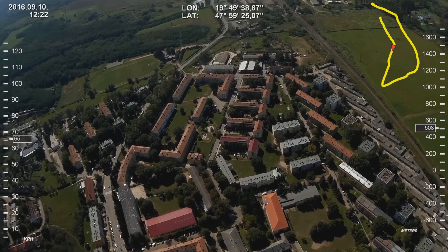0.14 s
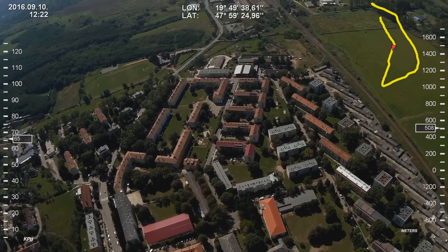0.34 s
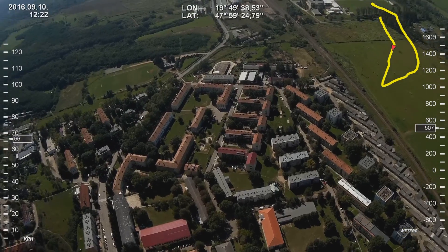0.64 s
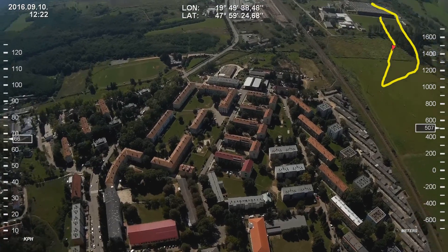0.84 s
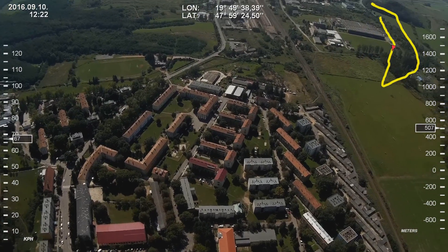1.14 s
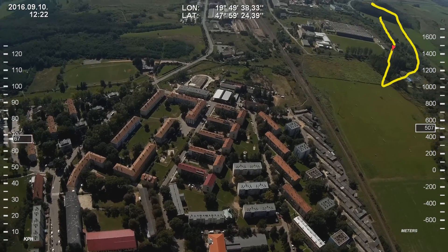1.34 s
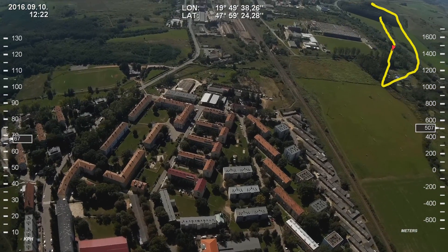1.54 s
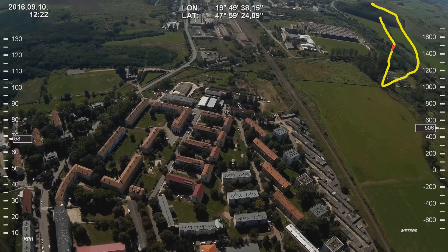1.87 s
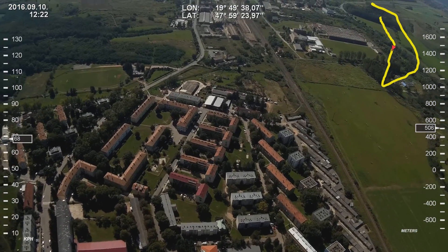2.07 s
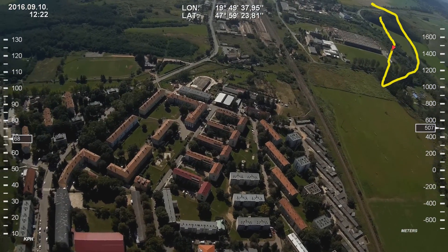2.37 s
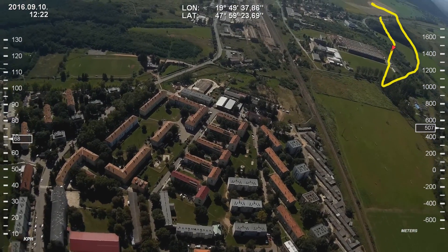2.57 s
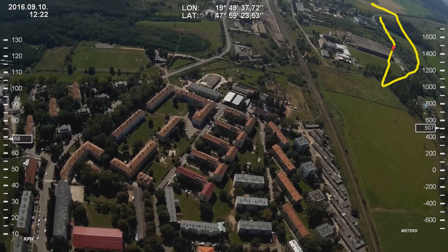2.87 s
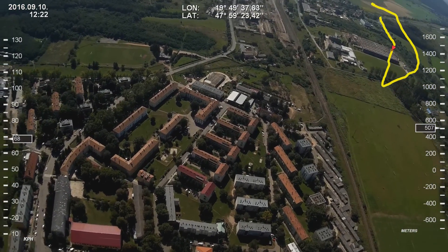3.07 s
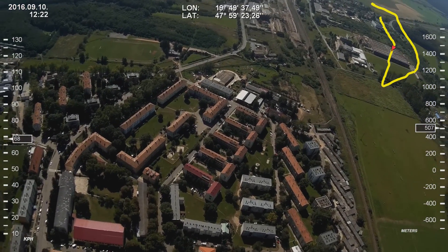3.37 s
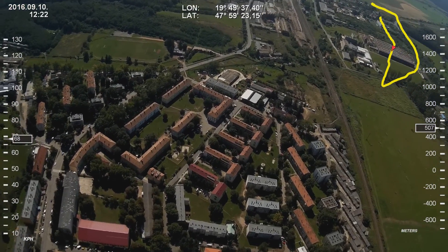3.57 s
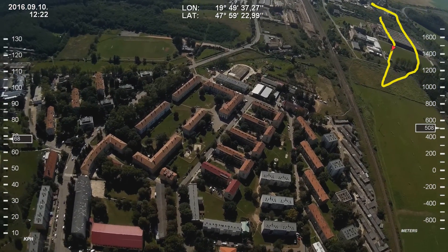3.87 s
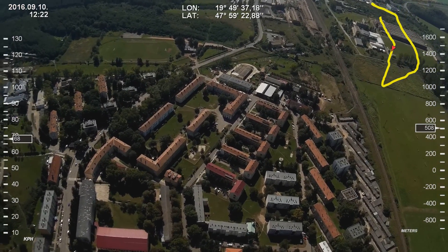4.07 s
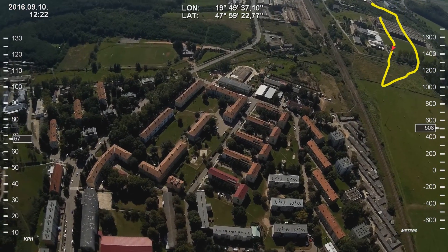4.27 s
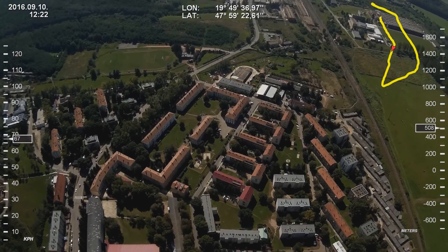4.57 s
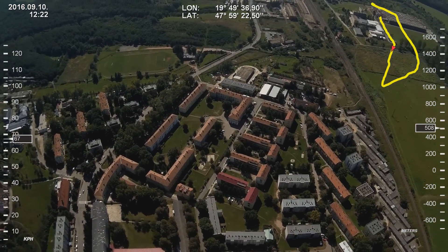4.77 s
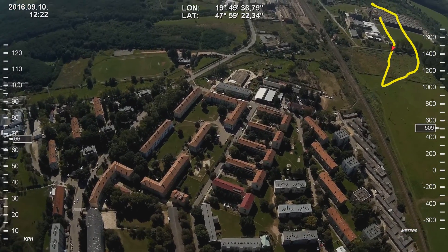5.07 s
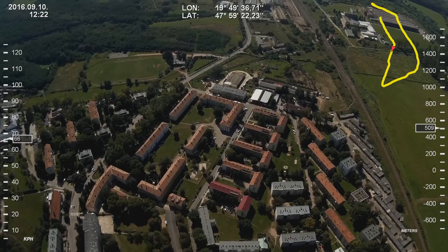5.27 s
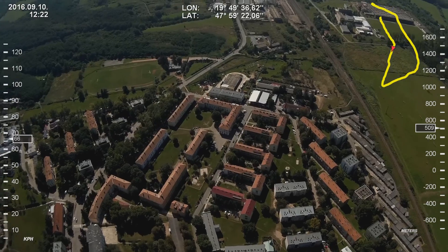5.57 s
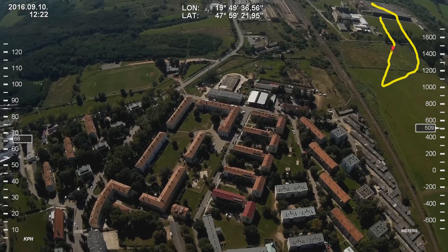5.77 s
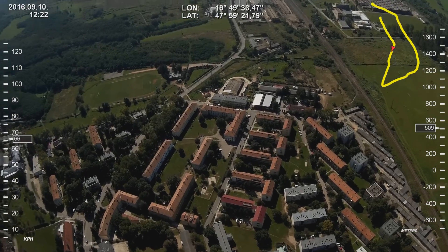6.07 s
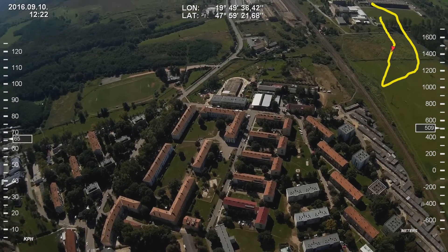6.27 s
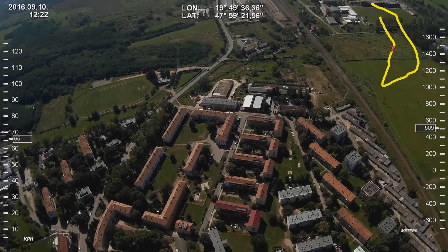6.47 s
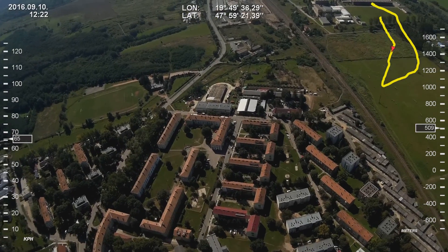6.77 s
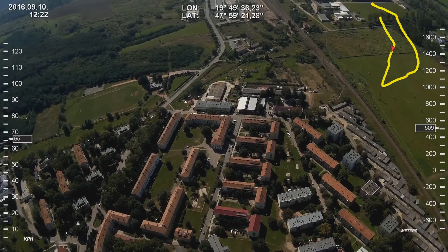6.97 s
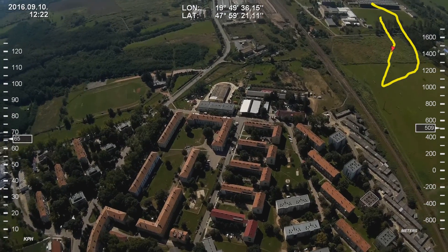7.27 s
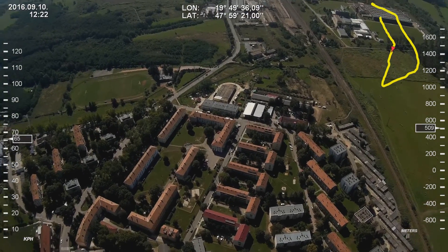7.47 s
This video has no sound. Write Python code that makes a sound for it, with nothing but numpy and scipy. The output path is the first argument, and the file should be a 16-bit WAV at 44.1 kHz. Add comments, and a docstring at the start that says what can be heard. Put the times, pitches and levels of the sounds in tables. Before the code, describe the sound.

A small electric model plane drones in flight, heard from a microphone riding on its body. The propeller's buzzing hum sinks slowly in pitch, with a thin motor whine and a faint high whistle above it. Air rushes over the microphone throughout, gusty at first, calmer in the second half, then gusting again near the end as the hum dips a little more.

```python
"""A propeller's hum, close up and slowly sinking in pitch, with a thin whine and gusty air around it.
The microphone rides on the body of a small model plane in flight, so every source is heard throughout.
The two-blade propeller hums on multiples of the shaft speed, the motor's magnets whine through the mount,
the speed controller's switching tone beats with the passing poles, and the slipstream rushes over
the microphone."""
import sys
import numpy as np
from scipy import signal
from scipy.fft import rfft, irfft, next_fast_len
from scipy.io import wavfile

SR = 44100
rng = np.random.default_rng(int(sys.argv[2]) if len(sys.argv) > 2 else 0)


def to_wav(sig):
    """Store sig (one row per channel, or 1-D mono) as 16-bit WAV at the path in sys.argv[1].

    Samples outside -1..1 are clipped; the rate is SR.
    """
    pcm = np.clip(np.atleast_2d(sig), -1, 1) * 32767
    pcm = np.round(pcm).astype(np.int16)
    wavfile.write(sys.argv[1], SR, pcm.T)  # frames by channels


N = 336483

# shaft speed in flight: (time [s], speed [turns/s])
SHAFT_SPEED = [(0.0, 154.54), (0.2, 154.12), (0.54, 151.71), (0.62, 151.65), (0.72, 150.55), (1.12, 150.9),
               (1.26, 150.24), (1.42, 150.36), (1.64, 149.9), (1.78, 148.36), (2.2, 146.18), (2.44, 144.03),
               (2.7, 143.71), (3.02, 142.13), (3.18, 143.05), (3.42, 142.23), (3.7, 142.55), (3.86, 143.73),
               (4.7, 143.84), (4.82, 143.0), (5.24, 142.69), (5.32, 143.04), (5.74, 142.7), (5.86, 141.86),
               (6.46, 141.93), (6.62, 140.9), (7.0, 139.59), (7.1, 138.59), (7.38, 137.21), (7.62, 137.45)]
# gusts at the plane, above calm air: (time [s], level [dB])
GUST_STRENGTH = [(0.0, 9.5), (0.42, 17), (0.85, 13), (1.1, 10.5), (1.42, 7), (1.56, 12), (1.92, 10),
                 (2.1, 13), (2.85, 13), (3.25, 10), (3.55, 9), (4.0, 6), (4.35, 7.5), (4.65, 5.5),
                 (5.3, 5.5), (5.6, 5), (6.4, 2), (6.8, 4), (6.85, 11.5), (7.1, 14), (7.21, 9), (7.29, 13.5),
                 (7.38, 10.5), (7.63, 12)]
# main propeller tones: (shaft multiple, level in calm cruise [dB], change above cruise [dB per turn/s],
# change below cruise [dB per turn/s], change with gusts [dB per dB], waver [dB])
PROPELLER_TONES = [(1, -31, -0.47, -1, 0.1938, 2.0), (2, -19.5, 0.13, -0.97, 0.0525, 0.1),
                   (4, -38, 0.32, 0.23, 0.7442, 1.5), (6, -33, 0.3, 0.4, -0.1035, 1.5)]
# the tone of the motor's twelve slots: one row, same columns
SLOT_TONE = (12, -27, -0.5, -0.7, -0.2155, 0.6)
# weaker tones of blades (even) and frame (odd): (shaft multiple, level in calm cruise [dB])
OVERTONE_LEVELS = [(3, -49.5), (5, -46), (8, -35.5), (10, -40.5), (11, -45), (15, -46), (16, -37.5),
                   (18, -37), (19, -49), (20, -38.5), (21, -52), (22, -43.5), (24, -45), (26, -48)]
# how those overtones respond: the last four columns of PROPELLER_TONES
BLADE_RESPONSE, FRAME_RESPONSE = (0.21, -0.42, -0.2, 0.97), (0.44, 0.01, 0.01, 1.1)
# magnetic pull of slots and poles: (shaft multiple, level before the mount [dB], lag through it [rad])
MAGNET_PULL = [(13, 0.5, 2.33), (14, 0.5, 3.32)]
# what the motor mount passes on to the microphone: (frequency [Hz], gain [dB])
MOUNT_RESPONSE = [(1740, -15), (1790, -15), (1830, -19.5), (1870, -19), (1930, -24), (1995, -29),
                  (2030, -27), (2080, -24), (2130, -20), (2200, -19)]
# switching mixed with the pole rate; multiples are rounded in use:
# (switching multiple, pole rate multiple, level before the stator [dB])
SWITCHING_BEATS = [(1, -3, -1.5), (-1, 6, -1), (2, -5.5, -9.5), (-2, 7.5, -11.5), (0, 3, -0.5), (0, 2, -8),
                   (1, -4, -6)]
# what the stator radiates of its switched currents: (frequency [Hz], gain [dB])
STATOR_RESPONSE = [(1450, -36.5), (1660, -27), (1920, -40), (2040, -26), (2230, -33.5), (3000, -41.5),
                   (3550, -31), (3900, -44), (3980, -39), (3996, -39.5), (4008, -41.5), (4060, -43),
                   (4300, -52.5), (4680, -48), (5100, -64), (5950, -50), (6400, -66)]
# steady flow over the body: (frequency [Hz], relative level [dB])
RUSH_SPECTRUM = [(15, -9), (40, -2.5), (70, 3.5), (200, 2), (400, -2.5), (800, -10), (1300, -7),
                 (1800, -2.5), (2600, -9), (3500, -12.5), (4300, -23), (5500, -37), (6300, -37.5),
                 (6900, -58.5)]
# gusts on the microphone: (frequency [Hz], relative level [dB])
GUST_SPECTRUM = [(120, -33), (250, -5), (450, 0.5), (800, 2), (1100, -1), (1600, -5), (2500, -23.5)]
# sizzle right at the microphone's edge: (frequency [Hz], relative level [dB])
SIZZLE_SPECTRUM = [(1500, -18), (2400, 3), (3500, -1), (4500, -8.5), (5500, -18), (6500, -7), (7000, -5.5),
                   (7500, -17.5)]

CRUISE_TURNS_PER_S, POLES = 142, 14
SWITCH_HZ, SWITCH_DB = 7994.8, -41.5
RUSH_DB, GUST_DB, SIZZLE_DB = -23, -33.5, -43   # in calm air, before the air noise's top treble is cut
AIR_TOP_HZ, TREBLE_TOP_HZ = 7800, 10384
OVERLOAD = 0.7   # amplitude at which the input stage flattens


def from_db(db):
    """Amplitude gain of a level in dB."""
    return 10 ** (np.asarray(db) / 20)


def unit_rms(x):
    """Scale to rms 1."""
    return x / np.sqrt(np.mean(x ** 2) + 1e-20)


def in_time(curve):
    """A (time, value) curve, one value a sample."""
    times, values = np.transpose(curve)
    return np.interp(np.arange(N) / SR, times, values)


def at_hz(spectrum, hz):
    """Read a spectrum's dB on a log-frequency axis."""
    frequencies, levels = np.transpose(spectrum)
    return np.interp(np.log(hz), np.log(frequencies), levels)


def drift(rate_hz):
    """Random wander of spread 1: noise at every 40th sample through a double one-pole low-pass."""
    pole = np.exp(-80 * np.pi * rate_hz / SR)
    wander = signal.lfilter([1], [1, -2 * pole, pole * pole], rng.standard_normal(N // 40 + 2002))[2000:]
    return np.interp(np.arange(N) / 40, np.arange(len(wander)), unit_rms(wander))


def tone(phase, level_db, waver_db):
    """A cosine whose strength wavers around the given rms level."""
    return np.sqrt(2) * from_db(level_db + waver_db * drift(13)) * np.cos(phase)


def propeller(angle, speed, gust_db):
    """Imbalance once a turn, a pressure pulse from each of two blades, the slot tone and overtones."""
    above_cruise = np.maximum(speed - CRUISE_TURNS_PER_S, 0)
    below_cruise = np.maximum(CRUISE_TURNS_PER_S - speed, 0)

    def harmonic(multiple, cruise_db, per_faster, per_slower, per_gust, waver_db, lag=0):
        """One shaft multiple; its level follows the speed and the gusts that load the blades."""
        level_db = cruise_db + per_faster * above_cruise + per_slower * below_cruise + per_gust * gust_db
        return tone(round(multiple) * angle - lag, level_db, waver_db)

    overtones = 0
    for multiple, db in OVERTONE_LEVELS:
        response = FRAME_RESPONSE if round(multiple) % 2 else BLADE_RESPONSE
        overtones += harmonic(multiple, db, *response)
    hum = sum(harmonic(*row) for row in PROPELLER_TONES)
    slots = harmonic(*SLOT_TONE, lag=MAGNET_PULL[0][2])
    return hum + slots + overtones


def motor(angle, speed):
    """The magnets' whine lags through the mount and swells as it slides onto a resonance there."""
    whine = 0
    for multiple, db, lag in MAGNET_PULL:
        mount_db = at_hz(MOUNT_RESPONSE, round(multiple) * speed)
        whine += tone(round(multiple) * angle - lag, db + mount_db, waver_db=0.21)
    return whine


def controller(angle, speed):
    """Steady switching, and its sums and differences with the pole rate; some glide against the speed."""
    switch_phase = 2 * np.pi * SWITCH_HZ * np.arange(N) / SR
    whistle = tone(switch_phase, SWITCH_DB + 1.34 * drift(56), waver_db=0.13)
    for switch_multiple, pole_multiple, db in SWITCHING_BEATS:
        per_switch, per_turn = round(switch_multiple), POLES * round(pole_multiple)
        beat_hz = abs(per_switch * SWITCH_HZ + per_turn * speed)
        beat_phase = per_switch * switch_phase + per_turn * angle
        whistle += tone(beat_phase, db + at_hz(STATOR_RESPONSE, beat_hz), waver_db=1.2)
    return whistle


def turbulence(spectrum, flicker_db):
    """Air noise of a given colour, split into nine octaves that flicker partly together; rms 1."""
    size = next_fast_len(N)
    hz = np.arange(size // 2 + 1) * SR / size + 1e-3
    coloured = rfft(rng.standard_normal(size)) * from_db(at_hz(spectrum, hz))
    air, together = 0, drift(42)
    for centre in np.log2(22) + np.arange(9):
        share = np.cos(np.pi / 2 * np.clip(np.log2(hz) - centre, -1, 1)) ** 2
        flicker = from_db(flicker_db * (0.45 * together + drift(12)))
        air += flicker * irfft(coloured * share, size)[:N]
    return unit_rms(air)


def slipstream(angle, gust_db):
    """Air right on the microphone: steady rush, gusts, and a sizzle that eddies make spiky."""
    blade_push = 1 + 0.29 * np.cos(2 * angle)
    rush = from_db(RUSH_DB) * turbulence(RUSH_SPECTRUM, flicker_db=0.14) * blade_push
    gusts = from_db(GUST_DB + gust_db) * turbulence(GUST_SPECTRUM, flicker_db=1.44)
    eddies = unit_rms(from_db(5.8 * drift(260)))
    sizzle_gain = from_db(SIZZLE_DB + 0.89 * gust_db)   # follows most of each gust's swing
    sizzle = sizzle_gain * eddies * turbulence(SIZZLE_SPECTRUM, flicker_db=1.3) * blade_push
    air_low_pass = signal.cheby2(10, 60, AIR_TOP_HZ, fs=SR, output="sos")
    return signal.sosfilt(air_low_pass, rush + gusts + sizzle)


def scene():
    """Mono, from the plane's body: all sources share one shaft, whose speed trembles slightly."""
    speed, gust_db = in_time(SHAFT_SPEED), in_time(GUST_STRENGTH)
    angle = 2 * np.pi * np.cumsum(speed + 0.0419 * drift(9.3)) / SR
    drive = propeller(angle, speed, gust_db) + motor(angle, speed) + controller(angle, speed)
    return (drive + slipstream(angle, gust_db))[None]


def record(dry):
    """The microphone's input stage flattens only the highest peaks; the top of the treble is cut."""
    flattened = dry / (1 + (dry / OVERLOAD) ** 6) ** (1 / 6)
    low_pass = signal.cheby2(12, 70, TREBLE_TOP_HZ, fs=SR, output="sos")
    return signal.sosfilt(low_pass, flattened)


dry = scene()
out = record(dry)
to_wav(out)
```